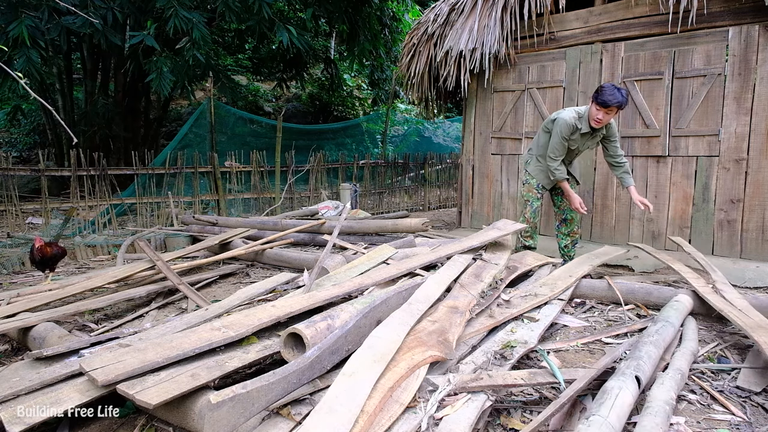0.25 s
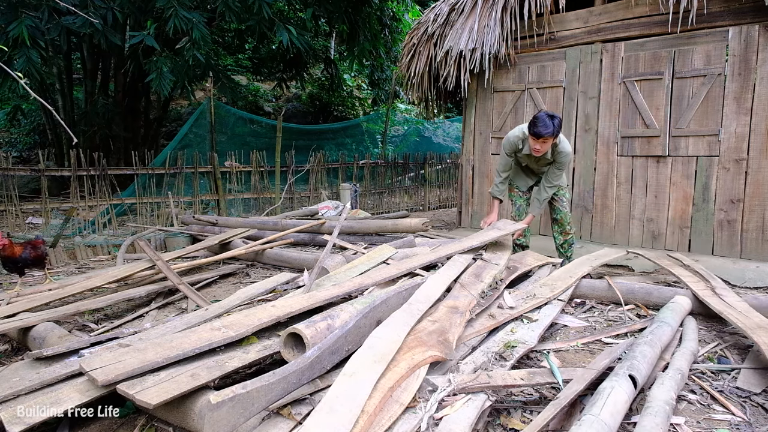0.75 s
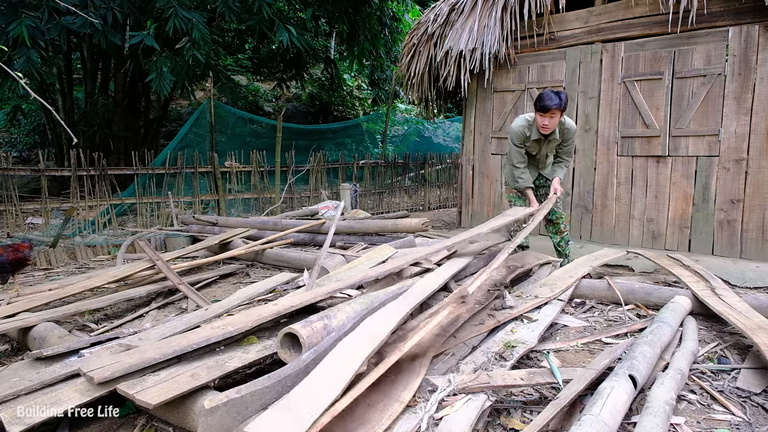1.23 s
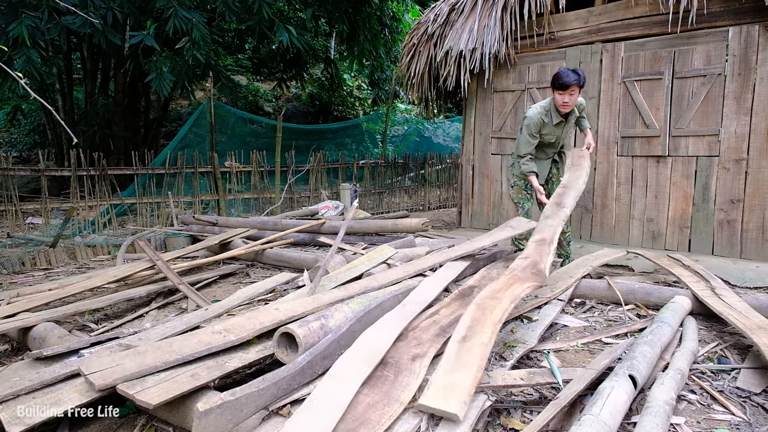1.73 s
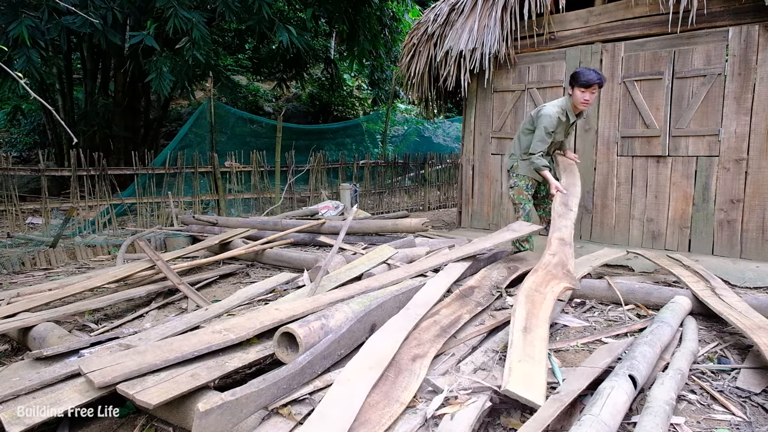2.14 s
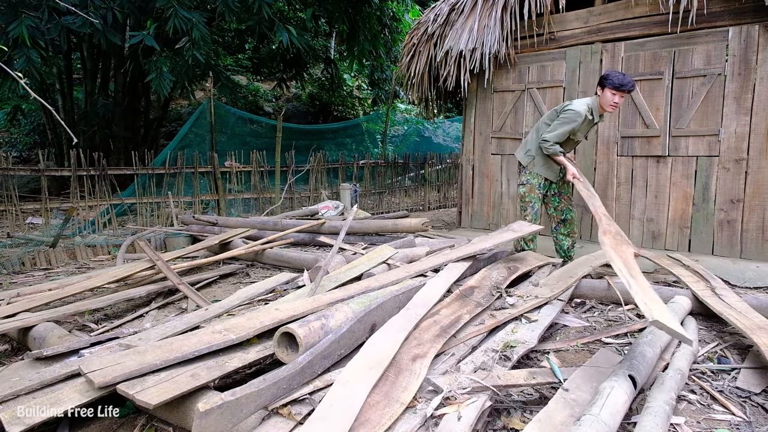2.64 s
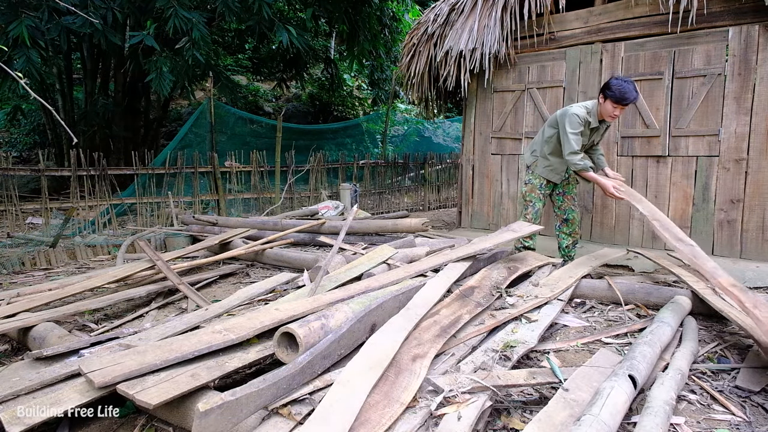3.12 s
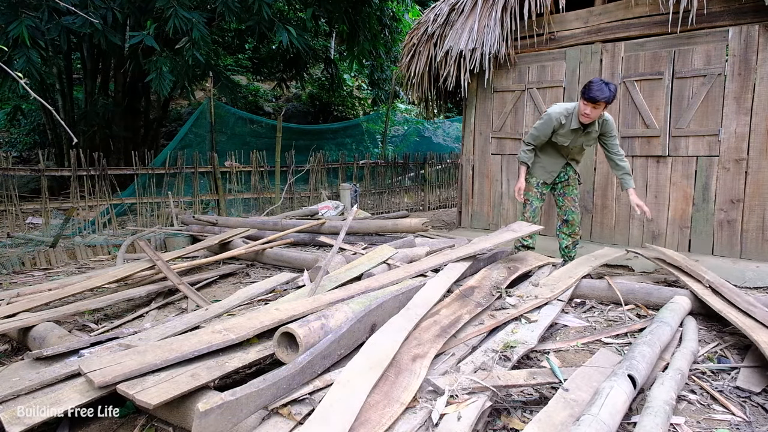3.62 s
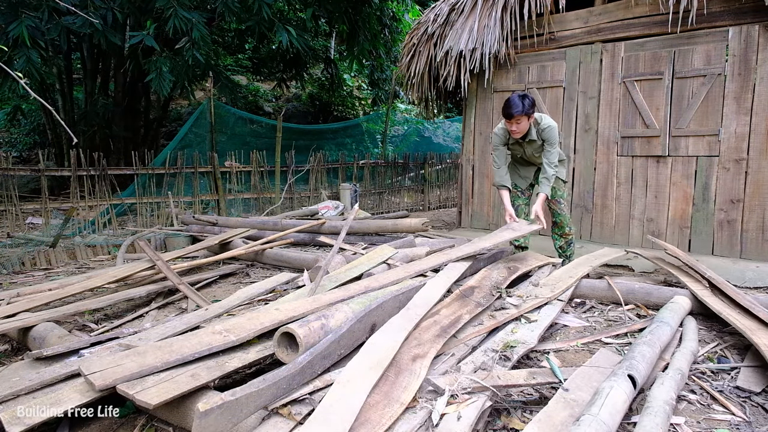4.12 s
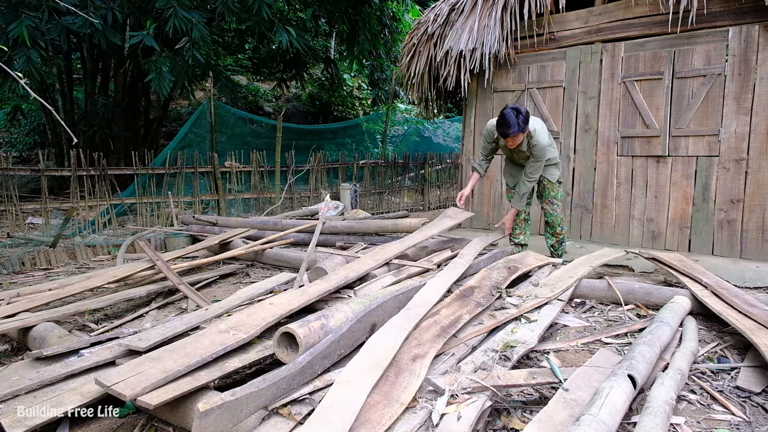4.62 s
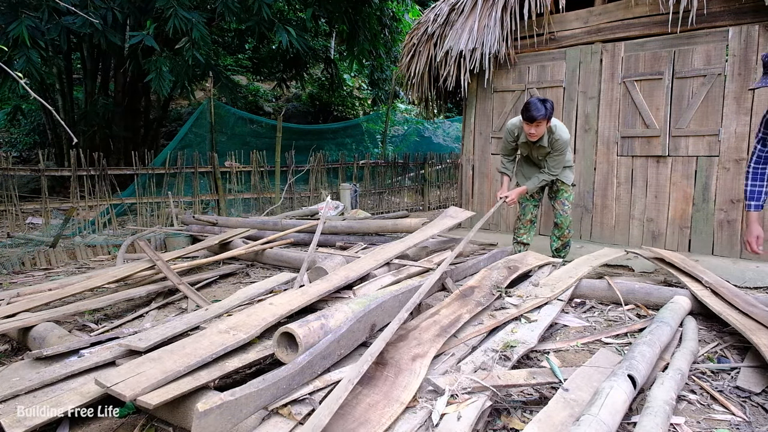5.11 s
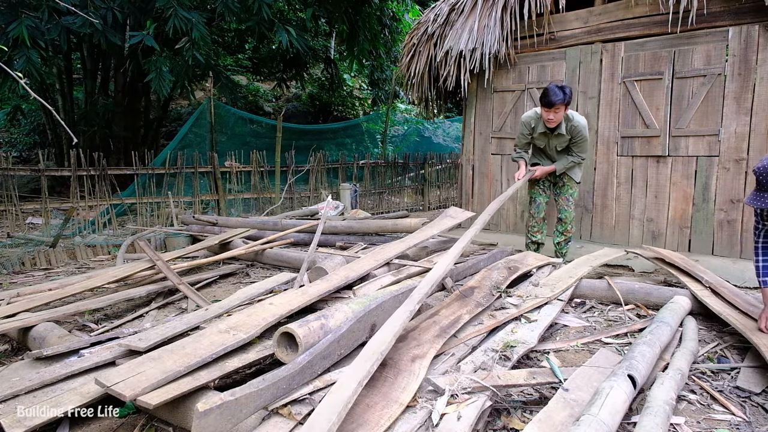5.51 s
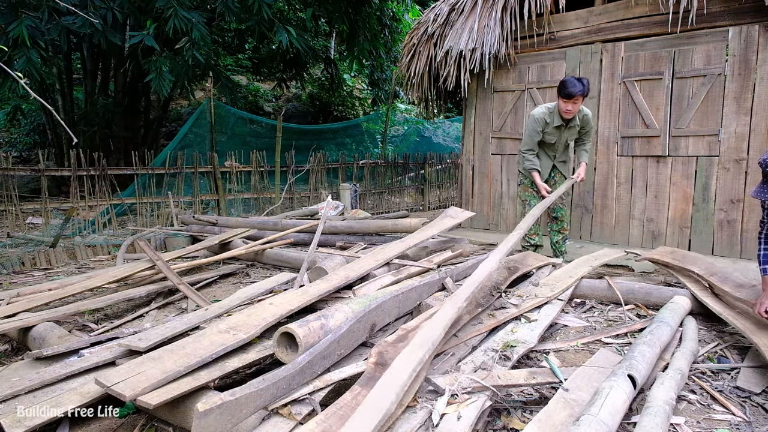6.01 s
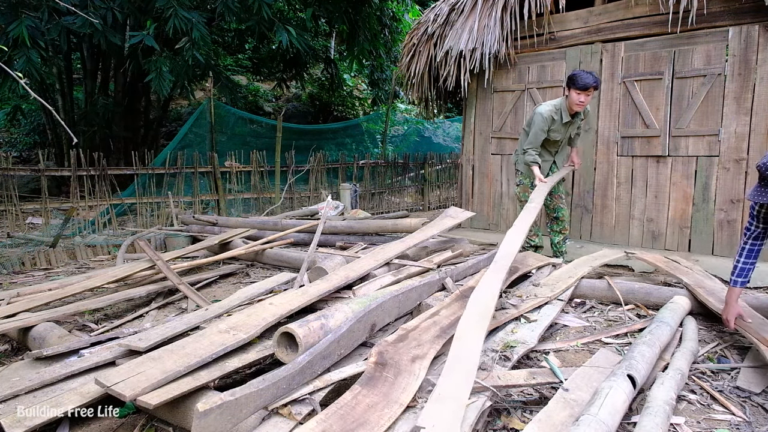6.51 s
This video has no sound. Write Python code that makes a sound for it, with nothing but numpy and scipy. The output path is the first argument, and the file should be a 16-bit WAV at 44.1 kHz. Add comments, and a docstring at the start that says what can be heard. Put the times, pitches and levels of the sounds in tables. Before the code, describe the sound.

Wooden boards are dragged and thrown onto a pile in a yard, knocking and rattling, while hens cluck softly.

```python
"""Rough planks are dragged out of a pile in a yard and thrown down on other planks.
Knocks and scraping ring the dense, quickly damped wood modes; one lifted slab rings longer.
Bark and dust hiss, crackle and snap. Hens cluck in short harmonic glides; insects buzz in the trees.
Shed wall, fence and trees return a dull echo. The loudest blows overload the microphone."""
import sys
import numpy as np
from scipy import signal
from scipy.fft import rfft, irfft, next_fast_len
from scipy.io import wavfile

SR = 44100
rng = np.random.default_rng(int(sys.argv[2]) if len(sys.argv) > 2 else 0)


def inscribe(sig):
    """Save sig as 16-bit PCM at rate SR to the path in sys.argv[1].

    A 1-D sig is mono; a 2-D sig holds one channel per row.
    Samples are clipped to [-1, 1] before scaling.
    """
    pcm = np.round(np.clip(np.atleast_2d(sig).T, -1, 1) * 32767)
    wavfile.write(sys.argv[1], SR, pcm.astype(np.int16))


N = 297675

# Table levels are relative; each source adds its own gain.
# Drag strokes: peak t/s, swell/s, fade/s, rasp/dB, rumble, grating, hiss/dB re rasp, rasp centre f/Hz
DRAG_STROKES = [(0.0, .05, 0.037, -34, -8.5, -25, -22, 1200), (.32, 0.17, 0.28, -20, -4, -15, -26.5, 1230),
                (.52, 0.2, 0.9, -33.5, -5, -15, -25.5, 1300),
                (1.0, 0.22, 0.2, -47.5, -25, -10.5, -17.5, 1680),
                (1.125, 0.018, 0.35, -40.5, -8, -5.5, -12.5, 1400),
                (1.37, 0.31, 0.41, -32.5, -18, -11, -19.5, 1330),
                (1.55, 0.28, 0.27, -26.5, -12.5, -15.5, -24, 970),
                (1.82, 0.13, 0.29, -20, -5, -13, -43, 1210),
                (1.95, 0.32, 0.26, -33.5, -16, -11.5, -5, 1340),
                (2.22, 0.046, 0.089, -41, 2, -4.5, -3, 1300), (2.3, 0.9, 0.3, -43.5, -5, -7, -12.5, 1100),
                (2.72, .1, 0.23, -57, -24, -4, -8.5, 1515), (3.09, .1, 0.13, -46, -39, -4, -12.5, 1340),
                (3.37, 0.12, 0.22, -24.5, -8.5, -17, -25.5, 1180),
                (3.678, 0.082, 0.23, -19.5, -7, -17.5, -26.5, 1210),
                (3.9, .2, 0.19, -49, 7, -20, -13, 1100), (4.299, 0.27, 0.6, -46, -9, -3.5, -10.5, 1280),
                (4.458, 0.053, 0.081, -34.5, -9, 5.5, -11, 1520),
                (4.75, .3, 0.42, -49.5, -2.5, -3, -5.5, 1070),
                (4.97, 0.22, 0.072, -47.5, -19, -4, -18, 1640),
                (5.17, 0.22, 0.25, -41, -12, -10, -25, 1050), (5.42, .5, 1, -50.5, -13, -7, -11, 1310),
                (5.6, 0.28, 0.081, -43, -12, -4, -7.5, 1260), (5.822, 0.13, .15, -48.5, 6, -7, -10, 1080),
                (5.94, 0.066, 0.14, -36.5, -15, -13, -30, 1240),
                (6.05, 0.055, 0.14, -28.5, -31, -13, -22, 1220),
                (6.14, 0.17, .12, -25.5, -10, -11.5, -21, 1120),
                (6.21, .1, .04, -26.5, -58, -14, -25, 1440), (6.42, 0.45, 0.24, -33, -2.5, -11, -20, 1050),
                (6.74, 0.45, .1, -47, -22, -9, -5.5, 1120)]
# Struck plank shuffling to rest; rows rasp, rumble, grating, hiss:
# base level/dB, slope/(dB per blow dB), slope/(dB per crack dB), t60/s
SETTLING = [(-18, 1.24, -0.56, 0.15), (-31.5, .95, -0.52, 0.33), (-9.5, 1.54, 0.96, 0.15),
            (-30.5, 1.4, 0.93, 0.21)]
# Plank mode strength: f/Hz, level/dB
PLANK_SPECTRUM = [(59, -60), (100, -23), (310, -1), (717, 3), (911, 0.5), (1550, 4.5), (1970, -1.5),
                  (2590, -5.5), (3240, -11), (3910, -9), (6000, -34.5), (7800, -68.5), (13200, -120)]
# Mode decay of a struck plank: f/Hz, t60/s
PLANK_DECAY = [(120, 0.33), (260, 0.12), (700, 0.087), (1800, 0.042), (5000, 0.0054)]
# Bark and dust spectrum: f/Hz, level/dB
GRIT_SPECTRUM = [(2650, -13), (4500, -0.5), (6970, -5.5), (8680, -4), (9830, -8.5), (10600, -13),
                 (13700, -12), (15600, -14)]
# Bark and splinter snaps: t/s, level/dB
SNAPS = [(0.1466, -41), (0.178, -22), (0.2394, -19), (0.3052, -24), (0.3516, -14), (0.373, -20),
         (0.5272, -24), (0.6215, -16), (1.1154, -25), (1.2685, -17.5), (1.287, -20.5), (1.3608, -30),
         (1.486, -18), (1.512, -13), (1.8407, -20), (2.1939, -22.5), (2.2682, -23.5), (2.3052, -22.5),
         (2.343, -44), (2.3585, -22.5), (3.6493, -17.5), (3.7848, -26), (4.0048, -26), (4.6164, -27.5),
         (4.6269, -26.5), (4.6763, -26), (5.7783, -18), (6.2387, -26), (6.5236, -27), (6.6992, -45),
         (6.7101, -23.5)]
# Leaves and distant air: f/Hz, level/dB
AIR_SPECTRUM = [(40, -38), (90, -20), (120, -6), (170, -16), (300, -15), (500, -11), (900, -9), (1500, -10),
                (2500, -20), (6000, -22), (10000, -28), (15600, -32)]
# Plank on plank: t/s, blow/dB, low thud/dB re blow, high crack/dB re blow, rattle t60/s
BLOWS = [(0.032, -34, -21, -14, 0.022), (0.104, -37.5, -52, -11, 0.02), (0.133, -19, 15.5, -13, 0.024),
         (0.146, -2.5, -32, -23, 0.0075), (0.176, -1, -10.5, -21, 0.058), (0.202, 2, -39, -26, 0.031),
         (0.21, -3, -17.5, -11.5, 0.014), (0.22, 0.5, -40, -16.5, 0.014), (0.263, -3.5, -14, -13, 0.02),
         (0.298, -8, -20, -21, 0.024), (0.342, -7.5, -19, -16, 0.013), (0.371, 1.5, -58, -14, 0.017),
         (0.403, -8.5, -9.5, -34, 0.013), (0.483, -15, -16, -25, 0.02), (0.489, -6, -24, -28.5, 0.038),
         (0.53, -6, -29, -12.5, 0.01), (0.553, -7.5, -10, -29, 0.011), (0.569, -1.5, -33, -29, 0.017),
         (0.578, 3, -23, -15, 0.041), (0.622, -1, -27, -13, 0.017), (0.716, -15.5, -20, -21, 0.028),
         (0.727, -10.5, -16.5, -17.5, 0.041), (0.976, -35, -25, -14, 0.07), (1.12, -26.5, -39, -6, 0.06),
         (1.267, -23.5, -67, -8, 0.06), (1.453, -28.5, 8.5, -1, 0.011), (1.488, -17, -14, -12, 0.086),
         (1.514, -5, -9, -4.5, 0.051), (1.558, -19, -14, -14, 0.017), (1.614, -17, -7.5, -11, 0.0091),
         (1.663, -17.5, -15, -7.5, 0.042), (1.753, -13, -11, -18, 0.014), (1.759, -2, -12, -22, 0.037),
         (1.84, -9.5, -11.5, -26, 0.038), (1.925, -15, -16, -21, 0.0063), (2.125, -23, -5.5, -14, 0.021),
         (2.191, -24, -8, -19, 0.037), (2.241, -28.5, 3.5, -20, 0.035), (2.296, -24.5, 2.5, -12, 0.027),
         (2.367, -26, -1, -6, 0.1), (2.427, -6, -23, -11, 0.022), (2.681, -39, -36, -14, 0.021),
         (2.763, -52, -26, -13, 0.013), (2.774, -42.5, -29, -10.5, 0.018), (3.177, -3.5, -15.5, -21, 0.04),
         (3.184, 0.5, -50, -14.5, 0.012), (3.222, -9.5, -23, -13, 0.011), (3.267, -7.5, -16.5, -19, 0.11),
         (3.285, -3, -25, -8.5, 0.024), (3.322, -13.5, -8, -33, 0.011), (3.397, -13, -66, -22, 0.013),
         (3.417, -15.5, -11, -20, 0.047), (3.465, -13, -16, -26, 0.012), (3.51, -6.5, -60, -12, 0.015),
         (3.632, -20, -26, -22, 0.037), (3.649, -7, -14, -17, 0.027), (3.665, -6.5, -18, -20, 0.081),
         (3.677, -10, -1, -22, 0.036), (3.695, -9, -12, -11.5, 0.011), (3.711, -5.5, -19, -12.5, 0.033),
         (3.739, -12, -11.5, -19, 0.029), (3.772, -7.5, -11.5, -15, 0.023), (3.814, -15.5, -11, -18, 0.012),
         (3.859, -19.5, -13, -19.5, 0.023), (4.205, -38, -2, -15, 0.068), (4.411, -24.5, -9.5, -10, 0.026),
         (4.491, -24.5, -5, -28, 0.037), (4.56, -21.5, -12, -16, 0.015), (4.601, -35, -19, -4, 0.022),
         (4.659, -19, -6.5, -16.5, 0.028), (4.679, -40.5, -32, 9, 0.015), (4.829, -27, -30, -9, 0.056),
         (5.187, -31, -5.5, -15, 0.015), (5.197, -25, -12, -13, 0.017), (5.418, -40, -24, -3, 0.02),
         (5.47, -43.5, 2, -17, 0.017), (5.547, -37, -51, -11, 0.013), (5.611, -29, -48, 0, 0.019),
         (5.719, -43, -32, -7, 0.011), (5.75, -30.5, -8.5, -15, 0.016), (5.757, -17.5, -3, -20.5, 0.02),
         (6.016, -39, -45, -25, 0.014), (6.036, -23.5, -79, -11, 0.04), (6.217, -30, -53, -8, 0.015),
         (6.264, -5.5, -20, -18, 0.029), (6.278, 8, -19, -15, 0.019), (6.32, -7, -27, -19, 0.0098),
         (6.367, -10, -9, -17, 0.021), (6.571, -31.5, -3, -14, 0.011), (6.712, -36, 0, -5, 0.012)]
# Clucks: t/s, length/s, start f/Hz, end f/Hz, harmonics 1, 2, 3/dB, overtones/dB re harmonic 3
HEN_CALLS = [(0.82, 0.045, 574, 490, -45, -42.5, -61.5, -11),
             (2.682, 0.073, 567, 736, -50.5, -58.5, -61, -21.5),
             (2.767, 0.036, 554, 548, -58, -76.5, -82, -23),
             (2.854, 0.063, 432, 469, -73.5, -64.5, -84.5, -26.5),
             (3.032, 0.046, 470, 459, -84.5, -60, -58.5, -21.5),
             (4.791, 0.084, 518, 461.5, -48, -48, -63, -9)]
# Beak shaping of harmonics 4-8: f/Hz, level/dB
BEAK_SPECTRUM = [(1500, 18.5), (2100, 16), (2400, -6), (2900, 17.5), (3400, -0.5), (4500, -10)]
# Modes of the lifted slab: f/Hz, level/dB, t60/s
SLAB_MODES = [(253, -13, .8), (447, -15, .4), (501, -6, .25), (657, -17, .3), (840, -5, .3),
              (894, -20, .15)]
# Taps on the slab: t/s, level/dB, tilt/(dB per octave)
SLAB_TOUCHES = [(2.294, -27.5, -6.5), (2.366, -37, -3), (2.429, -19.5, 2)]

HOP = 16   # samples per friction step
DRAG_FADE_DB, DRAG_ROUNDNESS = 20, 1.21   # loss over a swell or fade; 1 = pointed, 2 = rounded
RASP_FOCUS_DB, RASP_SKIRT_DB = 31, 9   # loss per squared octave off centre; its cap
SETTLE_HZ, SNAP_T60_S, SLAB_GRIP_S = 1330, 0.026, 2.61
INSECT_HZ, INSECT_STAGE_WIDTH_HZ, INSECT_DB = 7400, 120, -73
THIN_HZ, SOFT_HZ = 180, 4840
ECHO_T60_S, ECHO_DB, ECHO_CUT_HZ = 0.24, -17.5, 740
MIC_LOW_HZ, MIC_HIGH_HZ, MIC_CEILING = 92, 15600, 0.97


def from_db(db):
    return 10 ** (np.asarray(db) / 20)


def unit_rms(x):
    return x / np.sqrt(np.mean(x ** 2) + 1e-20)


def at_hz(points, hz):
    table_hz, values = np.transpose(points)
    return np.interp(np.log(hz), np.log(table_hz), values)


def ring(force, hz, t60_s):
    """One mode: a unit click starts a decaying unit sine."""
    r, w = from_db(-60 / (t60_s * SR)), 2 * np.pi * hz / SR
    return signal.lfilter([0, np.sin(w)], [1, -2 * r * np.cos(w), r * r], force + 1e-18)


def coloured(x, spectrum):
    """Filter by an (f/Hz, level/dB) curve; N samples out."""
    size = next_fast_len(N)
    hz = np.maximum(np.fft.rfftfreq(size, 1 / SR), 1)
    return irfft(rfft(x, size) * from_db(at_hz(spectrum, hz)), size)[:N]


def contacts(per_s, spread_db, size):
    """Random impulses of uneven strength; rms 1."""
    strength = from_db(spread_db * np.minimum(rng.exponential(1, size), 5)) * rng.choice([-1, 1], size)
    return unit_rms(strength * (rng.random(size) < per_s / SR))


def drift(rate_hz):
    """Lines between unit Gaussian knots."""
    knots = rng.standard_normal(size=400)
    return np.interp(np.arange(N) / SR * rate_hz, np.arange(len(knots)), knots)


def add(track, start_s, piece):
    at = round(start_s * SR)
    track[at:at + len(piece)] += piece[:N - at]


def band_shares(hz):
    """Weight of a mode in the low and the high range of the wood."""
    return np.clip(np.log2(800 / hz), 0, 1), np.clip(np.log2(hz / 1700) * 2.5, 0, 1)


def mode_gain(hz):
    """Higher modes lie wider apart, so each carries more."""
    return from_db(at_hz(PLANK_SPECTRUM, hz) + 10 * np.log10(hz / 1300))


def rattle(t60_s, first):
    """First contact, then dying chatter; one row of energy 1 per event."""
    t = np.arange(4096) / SR
    chatter = contacts(2500, 1.9, (len(t60_s), len(t)))
    chatter[:, 0] = first
    force = chatter * from_db(-60 * t / t60_s[:, None])
    return force / np.sqrt(np.sum(force ** 2, axis=1, keepdims=True))


def friction():
    """Drags and settling add in power: rasp, rumble, grating, hiss/dB and rasp centre/Hz per hop."""
    t = np.arange(0, N, HOP) / SR
    power = np.full((4, len(t)), 1e-10)
    weighted_hz = SETTLE_HZ * power[0]
    for peak_s, swell_s, fade_s, rasp_db, *others_db, centre_hz in DRAG_STROKES:
        distance = np.maximum((peak_s - t) / swell_s, (t - peak_s) / fade_s)
        envelope_db = rasp_db - DRAG_FADE_DB * distance ** DRAG_ROUNDNESS
        stroke = from_db(envelope_db + np.array([0, *others_db])[:, None]) ** 2
        power += stroke
        weighted_hz += centre_hz * stroke[0]
    base_db, blow_slope, crack_slope, t60_s = np.transpose(SETTLING)[:, :, None]
    for start_s, blow_db, _, crack_db, _ in BLOWS:
        start_db = base_db + blow_slope * blow_db + crack_slope * crack_db
        shuffle = from_db(start_db - 60 * np.abs(t - start_s) / t60_s) ** 2 * (t >= start_s)
        power += shuffle
        weighted_hz += SETTLE_HZ * shuffle[0]
    return (*10 * np.log10(power), weighted_hz / power[0])


def sliding(rasp_db, rumble_db, grating_db, centre_hz):
    """Dense uneven contacts drive the modes: low rumble, mid rasp around its centre, high grating."""
    rubs = [contacts(3000, 2.28, N) * from_db(1.6 * drift(30)) for _ in range(5)]
    modes_hz = 110 * 2 ** np.linspace(0, 5.7, 90) * from_db(rng.normal(0, 0.2, 90))
    out = np.zeros(N)
    for k, hz in enumerate(modes_hz):
        low, high = band_shares(hz)
        focus_db = -np.minimum(RASP_FOCUS_DB * np.log2(hz / centre_hz) ** 2, RASP_SKIRT_DB)
        mid_db = (1 - low - high) * (rasp_db + focus_db)
        level_db = low * (rumble_db + 4) + mid_db + high * (grating_db + 9) - 31.5
        drive = rubs[k % 5] * np.repeat(from_db(level_db), HOP)[:N]
        out += (-1) ** k * mode_gain(hz) * ring(drive, hz, 0.39 * at_hz(PLANK_DECAY, hz))
    return out


def grit(hiss_db):
    """Bark and dust hiss and crackle under sliding wood, and snap at times; too damped to ring."""
    crackle = rng.standard_normal(N) + .5 * contacts(670, 2.8, N)
    out = unit_rms(crackle * from_db(2 * drift(48)))
    out *= np.repeat(from_db(hiss_db - 8.5), HOP)[:N]
    snaps = rattle(np.full(len(SNAPS), SNAP_T60_S), first=2.7)
    for (start_s, level_db), snap in zip(SNAPS, snaps):
        add(out, start_s, from_db(level_db - 3.5) * snap)
    return from_db(18) * coloured(out, GRIT_SPECTRUM)


def yard_air():
    """Leaves and distant air: steady shaped noise."""
    noise = rng.standard_normal(next_fast_len(N))
    return from_db(-55.5) * unit_rms(coloured(noise, AIR_SPECTRUM))


def insects():
    """Thin wavering buzz: noise through two resonator stages."""
    buzz = rng.standard_normal(N)
    for _ in range(2):
        buzz = ring(buzz, INSECT_HZ, 2.2 / INSECT_STAGE_WIDTH_HZ)
    return from_db(INSECT_DB + 2 * drift(7.2)) * unit_rms(buzz)


def knocks():
    """Each blow meets another plank: its own scatter of modes, summed as poles in the spectrum."""
    out, size, modes = np.zeros(N), 8192, 80
    delay = np.exp(-2j * np.pi * np.arange(size // 2 + 1) / size)   # one sample
    blow_band = slice(size * 600 // SR, size * 2500 // SR)   # 600-2500 Hz sets the level
    signs = np.resize([1, 1, -1, -1], modes)   # neighbours partly cancel off resonance
    scatter = rng.standard_normal((len(BLOWS), 2, modes))
    forces = rattle(np.array(BLOWS)[:, 4], first=9.7)
    for (start_s, blow_db, thud_db, crack_db, _), (detune, uneven), force in zip(BLOWS, scatter, forces):
        hz = 130 * 2 ** np.linspace(0, 5.5, modes) * from_db(0.32 * detune)
        low, high = band_shares(hz)
        colour_db = low * (thud_db + 9) + high * (crack_db + 11.5) + 1.5 * uneven
        gain = signs * mode_gain(hz) * from_db(colour_db)
        r = from_db(-60 / (at_hz(PLANK_DECAY, hz) * SR))[:, None]
        w = 2 * np.pi * hz[:, None] / SR
        body = gain @ (np.sin(w) * delay / (1 - 2 * r * np.cos(w) * delay + (r * delay) ** 2))
        spectrum = body * rfft(force, size)
        band_rms = np.sqrt(np.mean(np.abs(spectrum[blow_band]) ** 2))
        add(out, start_s, from_db(blow_db + 30.5) * irfft(spectrum / band_rms, size))
    return out


def hens():
    """Gliding harmonic clucks, soft ends, unsteady pitch; far ones lose their overtones."""
    out = np.zeros(N)
    for start_s, length_s, start_hz, end_hz, *levels_db, overtones_db in HEN_CALLS:
        hz = np.linspace(start_hz, end_hz, round(length_s * SR))
        jitter = 1 + .008 * drift(200)[:len(hz)]
        phase = 2 * np.pi * np.cumsum(hz * jitter) / SR
        upper_db = [levels_db[2] + overtones_db + at_hz(BEAK_SPECTRUM, k * hz) for k in range(4, 9)]
        call = sum(from_db(db + 7) * np.sin(k * phase) for k, db in enumerate(levels_db + upper_db, 1))
        add(out, start_s, call * signal.windows.tukey(len(hz), .4))
    return out


def slab():
    """Hung from one hand, the slab rings freely until the next tap or the final grip stops it."""
    out = np.zeros(N)
    stops_s = [start_s for start_s, _, _ in SLAB_TOUCHES[1:]] + [SLAB_GRIP_S]
    for (start_s, tap_db, tilt_db), stop_s in zip(SLAB_TOUCHES, stops_s):
        tap = signal.unit_impulse(round((stop_s - start_s) * SR))
        ringing = sum(from_db(tap_db + mode_db + tilt_db * np.log2(hz / 840)) * ring(tap, hz, t60_s)
                      for hz, mode_db, t60_s in SLAB_MODES)
        release = np.minimum(np.arange(len(tap))[::-1] / 300, 1)
        add(out, start_s, ringing * release)
    return out


def radiated(x):
    """Narrow boards radiate little bass; wood on wood is too soft to excite the top."""
    return signal.sosfilt(signal.butter(3, [THIN_HZ, SOFT_HZ], "band", fs=SR, output="sos"), x)


def echoes(x):
    """Short, dull scatter off shed wall, fence and trees."""
    t = np.arange(SR // 2) / SR
    scatter = rng.standard_normal(len(t)) * from_db(-60 * t / ECHO_T60_S) * (t > .008)
    scatter = signal.sosfilt(signal.butter(1, ECHO_CUT_HZ, fs=SR, output="sos"), scatter)
    return from_db(ECHO_DB) * signal.fftconvolve(x, scatter / np.sqrt(np.sum(scatter ** 2)))[:N]


def scene():
    """Wood, grit and hens with their echo, over air and insects; mono."""
    rasp_db, rumble_db, grating_db, hiss_db, centre_hz = friction()
    wood = knocks() + sliding(rasp_db, rumble_db, grating_db, centre_hz) + slab()
    near = radiated(wood) + grit(hiss_db) + hens()
    return (near + echoes(near) + yard_air() + insects())[None]


def record(dry):
    """Microphone: bass cut, hard clip, steep top cut."""
    x = signal.sosfilt(signal.butter(2, MIC_LOW_HZ, "high", fs=SR, output="sos"), dry)
    x = np.clip(x, -MIC_CEILING, MIC_CEILING)
    return signal.sosfilt(signal.ellip(12, .5, 80, MIC_HIGH_HZ, fs=SR, output="sos"), x)


dry = scene()
out = record(dry)
inscribe(out)
```